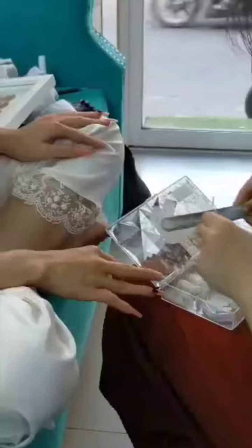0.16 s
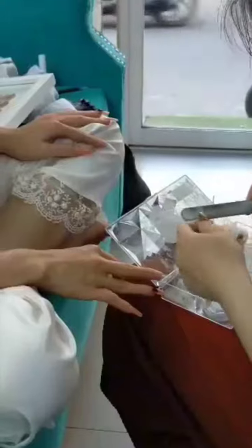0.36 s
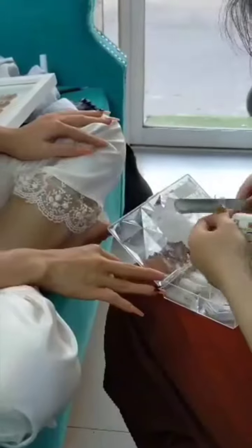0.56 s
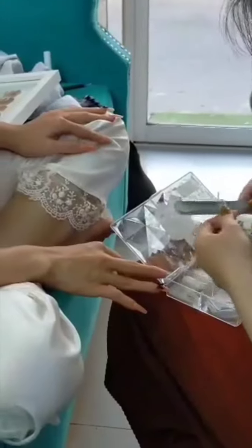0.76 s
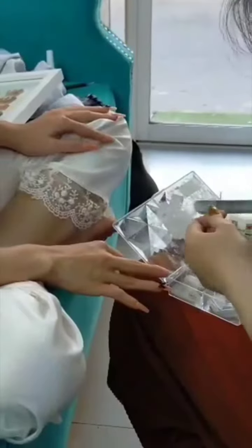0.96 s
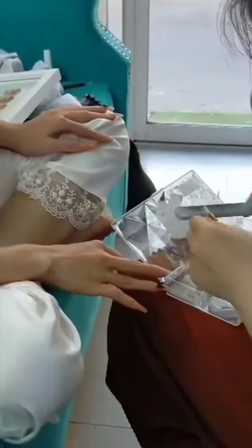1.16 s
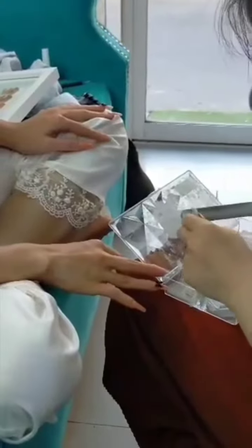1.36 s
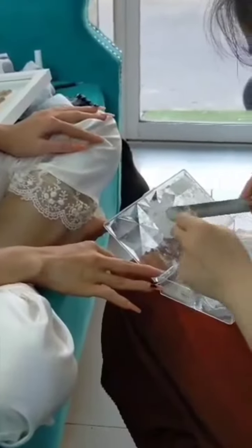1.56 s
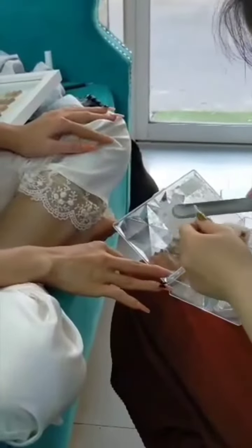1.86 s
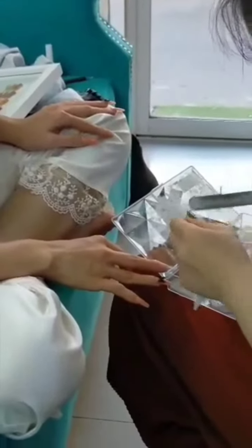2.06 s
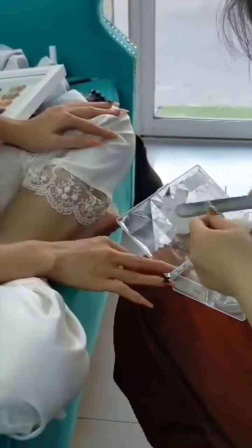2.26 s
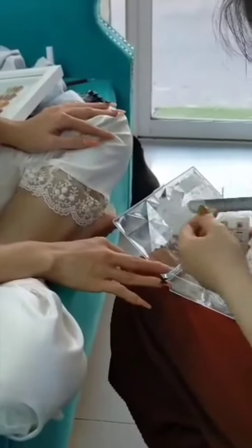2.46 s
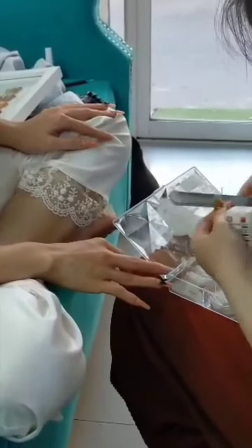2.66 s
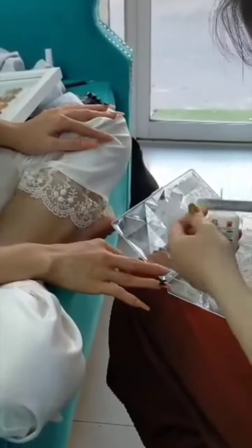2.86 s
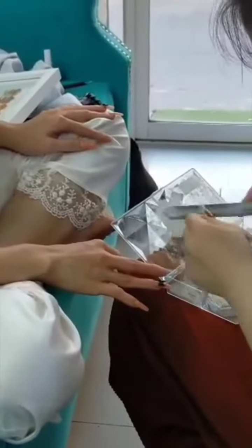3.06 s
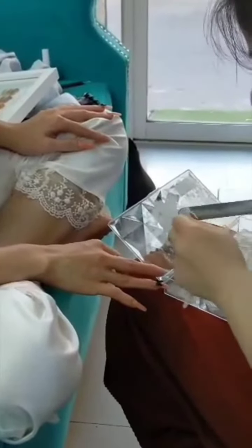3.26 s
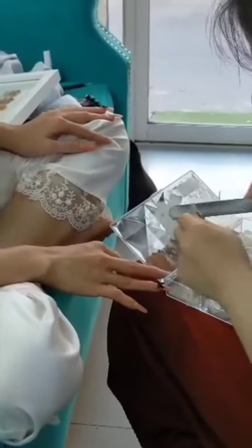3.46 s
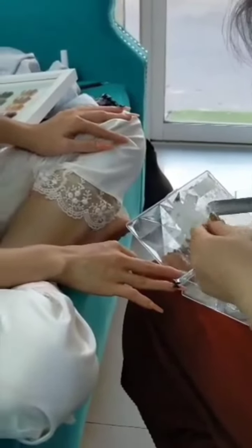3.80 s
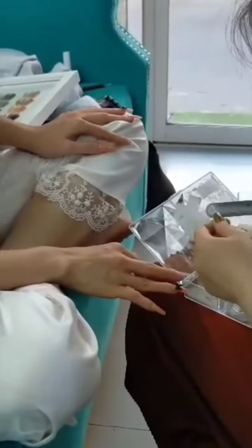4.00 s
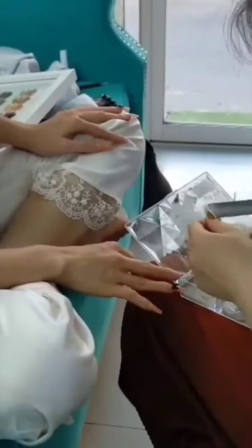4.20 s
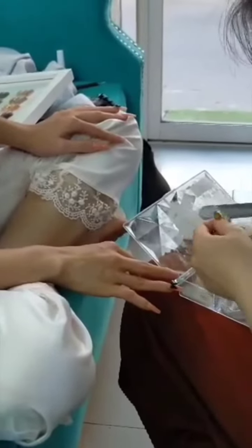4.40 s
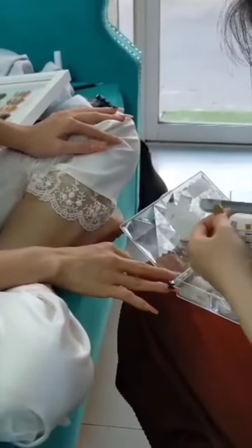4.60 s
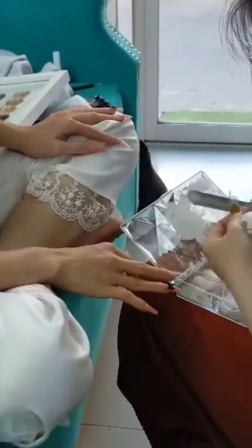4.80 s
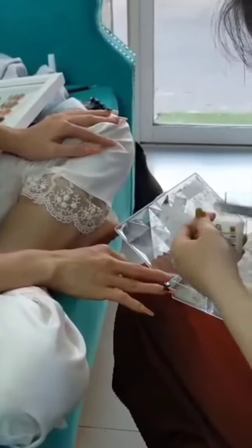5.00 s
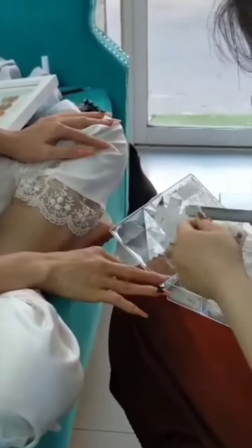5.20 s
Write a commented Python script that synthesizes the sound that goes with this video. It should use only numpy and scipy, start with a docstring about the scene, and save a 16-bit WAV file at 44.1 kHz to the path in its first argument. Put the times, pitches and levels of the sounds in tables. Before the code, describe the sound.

Close, dry filing on acrylic in a small salon: uneven runs of brief raspy scrapes, each about a tenth of a second, high and crisp with a thin metallic ring. Early strokes stutter, middle ones are smoother and airier, later ones rough again. Sharp snaps mark catches on the edge. Behind them, after initial silence, a passing car fades quickly into soft traffic wash, with barely audible horns late on.

```python
"""After a moment of silence, a metal file rasps to and fro over an artificial nail in a quiet salon.
Each stroke is noise from teeth tearing off fine grit, in bursts where the file sticks and slips.
The nail colours it with resonances that shift with the contact; the steel blade rings along.
Now and then the file catches with a sharp click, and a few soft plastic knocks fall in between.
Underneath, a car drives off at first, leaving a low wash of street and room and some far horns."""
import sys
import numpy as np
from scipy import signal
from scipy.fft import rfft, irfft, next_fast_len
from scipy.io import wavfile
from scipy.ndimage import map_coordinates

SR = 44100
rng = np.random.default_rng(int(sys.argv[2]) if len(sys.argv) > 2 else 0)


def persist_wave(psi):
    """Save psi, clipped to +-1, as 16-bit WAV."""
    counts = np.round(np.clip(psi, -1, 1) * 32767).astype(np.int16)
    wavfile.write(sys.argv[1], SR, np.atleast_2d(counts).T)


N = 275625  # length of the scene in samples

# File strokes. Each row: start in seconds, length in seconds, basic level in dB,
# swell from start to end in dB, ring of the nail in Hz, spot on the nail (a key of SPOTS).
STROKES = [(0.601, 0.12, -27.5, 1, 7450, "side"), (0.758, 0.083, -30.5, 14, 7650, "face"),
           (0.899, 0.11, -29.5, -7, 7760, "face"), (1.053, 0.077, -24.5, -2.5, 7300, "face"),
           (1.199, 0.092, -27.5, -3, 6910, "face"), (1.486, 0.068, -36.5, 14, 7900, "face"),
           (1.615, 0.074, -27.5, -2, 6260, "corner"), (1.74, 0.067, -30.5, 1, 7630, "side"),
           (1.881, 0.088, -28, -3, 6540, "tip"), (2.183, 0.054, -37.5, 8, 7600, "edge"),
           (2.312, 0.091, -32, 6, 7230, "edge"), (2.561, 0.12, -33, 10, 8140, "side"),
           (2.728, 0.12, -28, -3.5, 8230, "side"), (2.881, 0.14, -29.5, -3.5, 6940, "tip"),
           (3.045, 0.11, -28, -4.5, 8120, "side"), (3.339, 0.11, -37.5, 14, 8330, "side"),
           (3.499, 0.11, -32, -9, 7130, "tip"), (3.628, 0.096, -35, 3, 6850, "face"),
           (3.781, 0.082, -30, -8, 6800, "tip"), (3.904, 0.082, -39.5, -4.5, 6400, "corner"),
           (4.026, 0.092, -32, -4.5, 7100, "corner"), (4.351, 0.083, -40, -2, 6860, "edge"),
           (4.48, 0.067, -37, 4, 6550, "side"), (4.74, 0.084, -30, -5.5, 7440, "side"),
           (4.873, 0.12, -28.5, -6.5, 6870, "face"), (5.029, 0.11, -25.5, -4.5, 6630, "corner"),
           (5.184, .100, -30, 4.5, 7270, "edge"), (5.5, 0.081, -29, 6.5, 8020, "side"),
           (5.634, 0.088, -36.5, -8.5, 7400, "side"), (5.764, 0.083, -32.5, -1, 7030, "side"),
           (5.898, 0.095, -36, -3, 6800, "side"), (6.184, 0.12, -38.5, -1.5, 7300, "edge")]
# Where the file bears on the nail; the free end is softer. Each entry: antiresonance in Hz,
# body resonance in Hz, body in dB and air in dB (both at ordinary pressure).
SPOTS = {"face": (3240, 5300, 3.4, 2.3), "side": (3384.5, 4495.5, -0.5, -4.5),
         "edge": (3180, 2960, 4.9, 1.2), "tip": (1985.5, 3250, 2, 1), "corner": (1939.5, 5600, -1.5, -4)}
# How much the file sticks and slips. Each row: time in seconds, chatter from 0 to 1.
CHATTER = [(0.6, 0.8), (1.1, 1), (2.35, 1), (2.6, 0), (3.65, 0.04), (4.05, 1), (5.2, 0.85), (6.2, 1)]
# Colour of teeth on acrylic. Each row: frequency in Hz, level in dB per Hz.
RASP = [(300, -31.5), (1300, -20), (2600, -11), (3400, -9), (4000, -6.5), (4600, -8), (5250, -2),
        (5750, -7), (6800, -2.5), (8200, 2.5), (9600, -5), (11200, -9.5), (12500, -13)]
# How wide the treble of the rasp sounds, before SPREAD colours it.
# Each row: time in seconds, side against mid in dB.
WIDTH = [(0.6, -16), (1.3, -5.5), (1.5, -21), (2.4, -35), (2.6, -7.5), (3.301, -9.5), (5.3, -6), (5.5, -50),
         (5.7, -10)]
# Colour of the rasp's stereo width. Each row: frequency in Hz, level in dB.
SPREAD = [(3700, -66), (4150, -21.5), (4350, -6.5), (4800, -4), (7000, 3), (9500, 2.5), (11500, -1.5),
          (12900, -16)]
# The file catches on the nail's edge. Each row: time in seconds, peak in dB before blade and room.
CATCHES = [(0.670, -11.5), (1.057, -16), (1.082, -13), (1.617, -16), (1.893, -9), (2.238, -15),
           (2.318, -14.5), (2.4, -17), (2.735, -11.5), (3.503, -10.5), (3.78, -11.5), (4.045, -13.5),
           (4.754, -9.5), (5.032, -12), (5.041, -14.5), (5.093, -24.5)]
# Lightly damped modes of the steel blade. Each row: frequency in Hz, width in Hz, level in dB.
BLADE = [(2810, 8.7, -5), (3136, 17, 7.5), (3520, 16, 1), (3948, 117, 1.5), (5200, 33, -24),
         (6750, 7.7, -9.5), (7140, 43, 2), (8450, 17, -20), (9000, 20, -13.5)]
# Soft knocks. Each row: time in seconds, peak in dB before the lift in knocks().
KNOCKS = [(1.893, -54), (2.394, -27.5), (3.993, -23.5)]
# Modes of the knocked plastic. Each row: frequency in Hz, width in Hz, level in dB.
KNOCK_MODES = [(467, 250, 2), (1243, 170, 5), (1610, 170, -0.5), (2120, 130, -3.5)]
# Dying away of the room. Each row: frequency in Hz, time to fall by 60 dB in seconds.
ROOM = [(500, 0.21), (4000, 0.24), (8000, 0.25), (13000, 0.16)]
# Colour of the traffic rumble. Each row: frequency in Hz, level in dB per Hz.
RUMBLE = [(25, -22), (45, -41.5), (60, -18), (78, 2.5), (90, -7.5), (115, 0), (160, 2.5), (260, -7),
          (500, -23), (1000, -49)]
# Colour of the traffic's wash in the room. Each row: frequency in Hz, level in dB per Hz.
WASH = [(120, -25), (250, -3), (420, 1.5), (700, -6.5), (1200, -4), (2000, -15), (3500, -17), (8000, -25.5),
        (13000, -41.5)]
# Engine drone of the traffic outside. One row: frequency in Hz, level in dB against the rumble.
HUM = (109, -4.5)
# Far car horns. Each row: middle in seconds, half length in seconds, frequency in Hz, level in dB.
TONES = [(4.35, 0.13, 442, -62.5), (4.48, 0.078, 346.5, -63.5), (6.11, 0.089, 520, -65.5)]

START = .597  # the sound begins here (seconds)
TOP_HZ = 13150  # nothing sounds above this
# A stroke longer than FLAT_S (seconds) arches: the longer, the higher its middle over its ends.
ARCH_DB_PER_S, FLAT_S = 138.5, 0.065
USUAL_DB = -32.5  # level of a stroke at ordinary pressure
# Pressing harder gathers the sound in the ring: dB lost per dB of level.
BODY_LOSS, AIR_LOSS = 0.44, 0.45
NOTCH_WIDTH = .08  # width of the nail's antiresonance as a share of its frequency
RUMBLE_DB, WASH_DB = -67, -63  # steady traffic outside and its wash in the room
# A departing car adds this much at first, half of it after RECEDE_S seconds.
CAR_RUMBLE_DB, CAR_WASH_DB, RECEDE_S = 16, 11.5, .5
TYRE_HZ, TYRE_WIDTH_HZ, TYRE_DB = 1540, 1600, -51  # the car's tyre hiss; its level at the nearest


def amp(db):
    """Turn decibels into a gain."""
    return 10 ** (np.asarray(db) / 20)


def unit(x):
    """Scale x to an rms (average strength) of 1."""
    return x / np.sqrt(np.mean(x ** 2) + 1e-20)


def along(points, hz):
    """Read a table of (Hz, value) rows at any frequency, on a log axis."""
    table_hz, values = np.transpose(points)
    return np.interp(np.log(hz + 1), np.log(table_hz), values)


def wobble(rate):
    """Draw a smooth random curve through this many random points a second."""
    points = rng.standard_normal(int(N * rate / SR) + 4)
    return map_coordinates(points, [np.arange(N) * rate / SR])


def filtered(x, response):
    """Filter x by a complex response, given as a function of frequency."""
    n = x.shape[-1]
    padded = 2 * next_fast_len(n // 2 + 2048)  # spare room, so that the end does not wrap round
    spectrum = rfft(x, padded) * response(np.fft.rfftfreq(padded, 1 / SR))
    return irfft(spectrum, padded)[..., :n]


def causal(gain):
    """Give the minimum-phase response with this gain: it rings only after a blow."""
    cepstrum = irfft(np.log(np.maximum(gain, 1e-6)))
    half = len(cepstrum) // 2
    # fold the backward half of time onto the forward half
    cepstrum[1:half] *= 2
    cepstrum[half + 1:] = 0
    return np.exp(rfft(cepstrum))


def resonances(modes, hz):
    """Add up the responses of damped modes, each given as (Hz, width in Hz, dB)."""
    total = 0
    for mode_hz, width_hz, db in modes:
        damping = 1j * hz * width_hz
        total = total + amp(db) * damping / (mode_hz ** 2 - hz ** 2 + damping)
    return total


def filing(rise=0.0025, release=0.018, grit_db=3.5, chip_rate_hz=1800, settle=0.081,
           hardest=1.9, landing_db=8, landing_life=0.00088):
    """Each stroke bites with chatter, settles into an even rasp and lifts off; rows are mid and side."""
    out = np.zeros((2, N + SR))
    for start, length, stroke_db, swell_db, ring_hz, spot in STROKES:
        t = np.arange(int((length + .08) * SR)) / SR  # 80 ms extra for the lift-off
        chatter = np.interp(start, *np.transpose(CHATTER))
        share = np.clip(chatter * np.exp(-(t / settle) ** 2), 0, 1)
        force = np.sqrt(1 - share + share * slips(t) ** 2)

        # single teeth tear off chips of unequal size, up to what the nail can bear
        sizes = rng.standard_normal(SR // 20)
        chip_size = np.interp(t * chip_rate_hz, np.arange(len(sizes)), sizes)
        chips = amp(grit_db * chip_size)
        bite = np.tanh(unit(force * chips) / hardest)
        grit = bite * rng.standard_normal((2, SR // 2))[:, :len(t)]

        touched_nail = contact(stroke_db, ring_hz, spot)
        rasp = unit(filtered(grit, lambda hz: nail(hz, *touched_nail) * bounces(hz)))
        # the even hiss sounds wide, the chatter stays near the centre
        rasp[1] *= np.sqrt(1 - share)

        # a chattering stroke lands with a tick
        landing = landing_db * share * np.exp(-t / landing_life)
        pressure = amp(stroke_db + pressure_db(t, length, swell_db) + landing)
        touch_down = 1 - np.exp(-(t / rise) ** 2)
        lift_off = np.exp(-np.maximum(t - length, 0) / release)
        first = round(start * SR)
        out[:, first:first + len(t)] += rasp * pressure * touch_down * lift_off
    return out[:, :N]


def slips(t, gap=0.0075, scatter=.2, size_db=2, life=0.0033):
    """Stick and slip: a burst of force every few milliseconds, the first as the file lands."""
    draws = rng.standard_normal((64, 2))  # one row a burst: for its gap and its size
    gaps = gap * np.exp(scatter * draws[:, 0])
    burst_times = np.cumsum(gaps) - gaps[0]
    age = t - burst_times[:, None]
    bursts = (age >= 0) * np.exp(-np.abs(age) / life)
    sizes = amp(size_db * np.tanh(draws[:, 1]))
    return unit(sizes @ bursts)


def pressure_db(t, length, swell_db):
    """The hand presses in one smooth arc that leans towards the start or the end of the stroke."""
    along_stroke = np.minimum(t / length, 1) - .5  # from -0.5 to 0.5
    arch_db = ARCH_DB_PER_S * (length - FLAT_S)
    # the third keeps the arch at 0 dB on average over the stroke
    return swell_db * along_stroke + arch_db * (1 / 3 - (2 * along_stroke) ** 2)


def contact(level_db, ring_hz, spot):
    """The spot sets the nail's resonances; a light touch sounds broad, a firm one narrow."""
    notch_hz, body_hz, body_db, air_db = SPOTS[spot]
    firm_db = level_db - USUAL_DB
    return notch_hz, body_hz, ring_hz, body_db - BODY_LOSS * firm_db, air_db - AIR_LOSS * firm_db


def nail(hz, notch_hz, body_hz, ring_hz, body_db, air_db, ring_db=8.0, ring_width_hz=800,
         hump_db=4, hump_width_hz=280, bend_ratio=1.062, bend_width=0.53):
    """The nail's response at one point of contact: it bends, its body hums and it rings."""
    # the nail bends in a broad mode just above an antiresonance
    u = hz / notch_hz
    notch = 1 - u * u + 1j * u * NOTCH_WIDTH
    bend = bend_ratio ** 2 - u * u + 1j * u * bend_width
    bending = np.abs(notch / bend)
    ring = ring_db / (1 + ((hz - ring_hz) / ring_width_hz) ** 2)
    hump = hump_db / (1 + ((hz - body_hz) / hump_width_hz) ** 2)
    tilt = along([(5300, body_db), (7200, 0.0062), (10000, air_db)], hz)
    return causal(bending * amp(along(RASP, hz) + ring + hump + tilt))


def bounces(hz, strength=0.25):
    """Weak copies off the moving hands and the table comb each stroke differently."""
    delays = rng.uniform(0.000614, .004, (4, 1))  # seconds
    return 1 + strength * np.exp(-2j * np.pi * hz * delays).sum(0)


def catches(life=0.00066):
    """A tooth snaps free of the edge: a very short noise burst makes one hard click through the nail."""
    out = np.zeros(N + SR)
    t = np.arange(SR // 50) / SR
    edge = dict(notch_hz=3500, body_hz=5070, ring_hz=7760, body_db=-11, air_db=-4)
    for start, peak_db in CATCHES:
        snap = rng.standard_normal(len(t)) * np.exp(-t / life)
        click = filtered(snap, lambda hz: nail(hz, **edge))
        first = round(start * SR)
        out[first:first + len(t)] += amp(peak_db) * click / np.abs(click).max()
    return out[:N]


def blade(x):
    """The steel blade rings in its own lightly damped modes, added to the sound that shakes it."""
    return filtered(x, lambda hz: 1 + resonances(BLADE, hz))


def knocks(lift_db=1, low_hz=520):
    """Light, well damped knocks of plastic, too small to radiate bass."""
    blows = np.zeros(N)
    for start, peak_db in KNOCKS:
        blows[round(start * SR)] = amp(peak_db + lift_db)

    def body(hz):
        """The plastic's modes, weakened below low_hz."""
        bass_cut = causal(1 / np.sqrt(1 + (low_hz / (hz + 1)) ** 8))
        return resonances(KNOCK_MODES, hz) * bass_cut

    knock = filtered(signal.unit_impulse(SR // 20), body)
    return signal.fftconvolve(blows, knock / np.abs(knock).max())[:N]


def room(x, delay=.004):
    """The salon's answer: a tail of noise in which each frequency dies at its own speed."""
    hz, t, noise = signal.stft(rng.standard_normal(SR // 2), SR, nperseg=256)
    decay = amp(-60 * t / along(ROOM, hz)[:, None])
    tail = signal.istft(noise * decay, SR, nperseg=256)[1]
    tail = np.pad(tail, (int(delay * SR), 0))
    return signal.fftconvolve(x, tail / np.linalg.norm(tail))[:N]


def coloured_noise(spectrum):
    """Steady noise with the colour of a (Hz, dB per Hz) table, at rms 1."""
    return unit(filtered(rng.standard_normal(N), lambda hz: amp(along(spectrum, hz))))


def wavering_tone(hz, waver):
    """A sine at rms 1 whose phase wanders by about waver radians."""
    t = np.arange(N) / SR
    return np.sqrt(2) * np.sin(2 * np.pi * hz * t + waver * wobble(32))


def tyre_hiss():
    """Tyres hiss: noise through one broad resonance twice over, at rms 1."""
    mode = [(TYRE_HZ, TYRE_WIDTH_HZ, 0)]
    return unit(filtered(rng.standard_normal(N), lambda hz: resonances(mode, hz) ** 2))


def horns():
    """Far car horns: wavering tones that swell up and die away."""
    t = np.arange(N) / SR
    out = np.zeros(N)
    for middle, half, hz, db in TONES:
        swell = np.exp(-((t - middle) / half) ** 4)
        out += amp(db + 2.7 * wobble(25)) * swell * wavering_tone(hz, waver=0.52)
    return out


def background(rumble_sway_db=2.0, wash_sway_db=1.15):
    """Traffic outside and its wash in the room sink as a car leaves; a few far horns sound."""
    t = np.arange(N) / SR
    nearness = 1 / (1 + np.maximum(t - START, 0) / RECEDE_S)
    hum_hz, hum_db = HUM
    traffic = coloured_noise(RUMBLE) + amp(hum_db) * wavering_tone(hum_hz, waver=0.98)
    traffic_db = RUMBLE_DB + CAR_RUMBLE_DB * nearness + rumble_sway_db * wobble(7.9)
    wash_db = WASH_DB + CAR_WASH_DB * nearness + wash_sway_db * wobble(6.6)
    out = traffic * amp(traffic_db) + coloured_noise(WASH) * amp(wash_db)
    return out + tyre_hiss() * amp(TYRE_DB) * nearness + horns()


def scene(room_db=-14, side_room_db=-17):
    """Close filing in a small room, over a centred background; left and right differ only in the treble."""
    rasp, spread = filing()
    close = blade(rasp + catches()) + knocks()
    mid = close + amp(room_db) * room(close) + background()

    width_db = np.interp(np.arange(N) / SR, *np.transpose(WIDTH))
    side = spread * amp(width_db)
    side = side + amp(side_room_db) * room(side)
    side = filtered(side, lambda hz: amp(along(SPREAD, hz)))
    return np.array([mid + side, mid - side])


def record(dry):
    """Silence until START, then the sound opens within 2 ms; nothing passes above TOP_HZ."""
    opening = np.clip((np.arange(N) / SR - START) / 0.0017, 0, 1)
    return filtered(dry * opening, lambda hz: np.clip((TOP_HZ - hz) / 150, 0, 1))


dry = scene()
out = record(dry)
persist_wave(out)
```